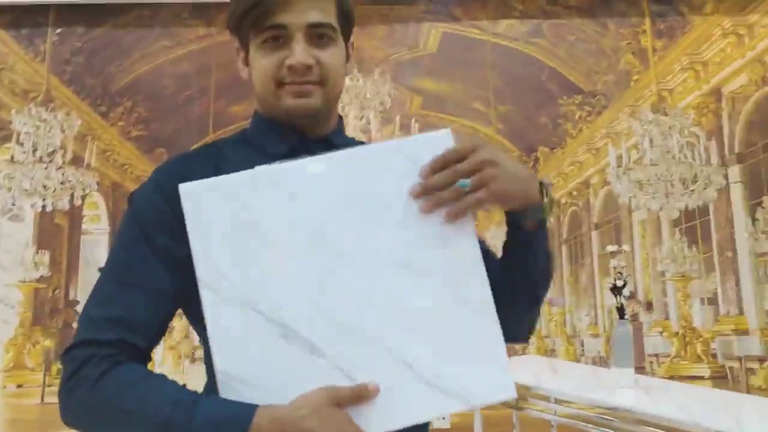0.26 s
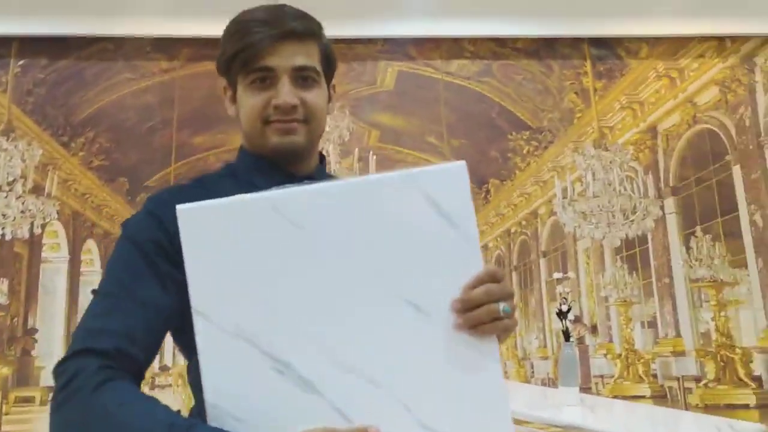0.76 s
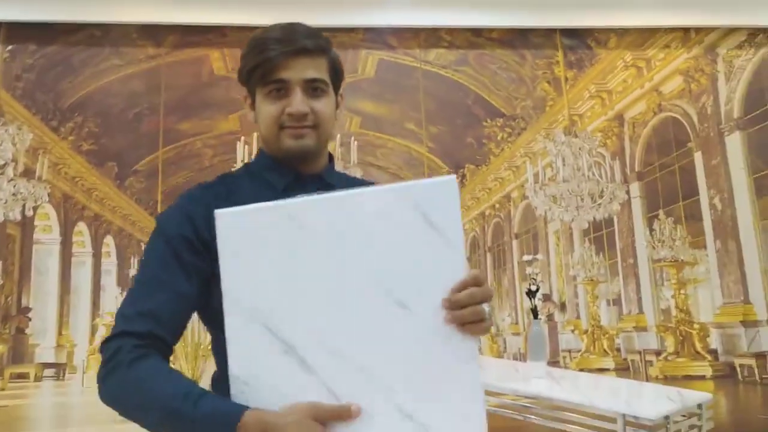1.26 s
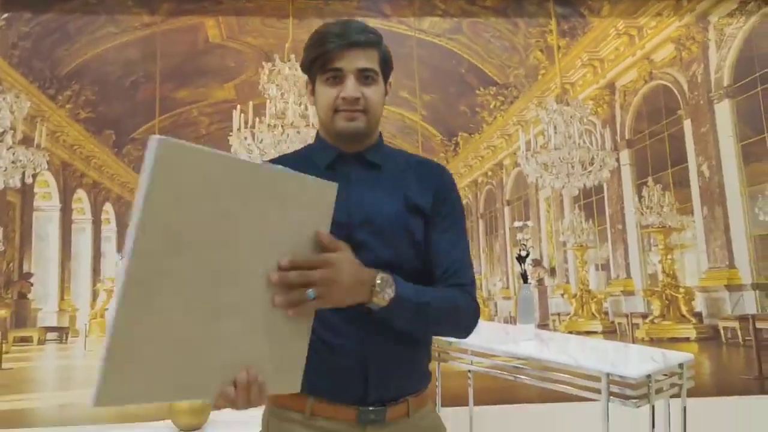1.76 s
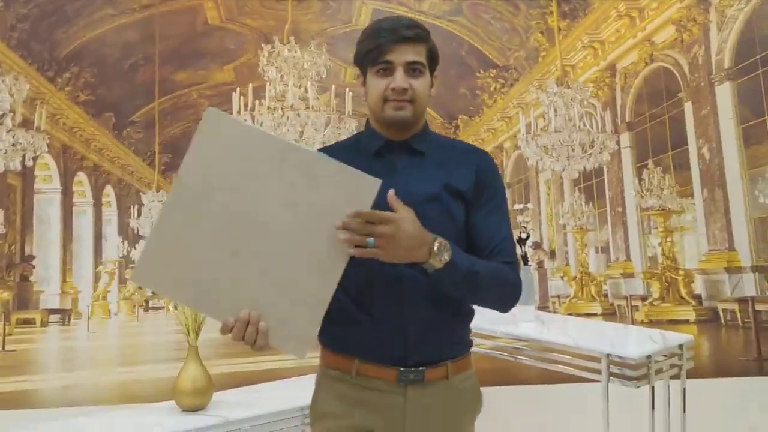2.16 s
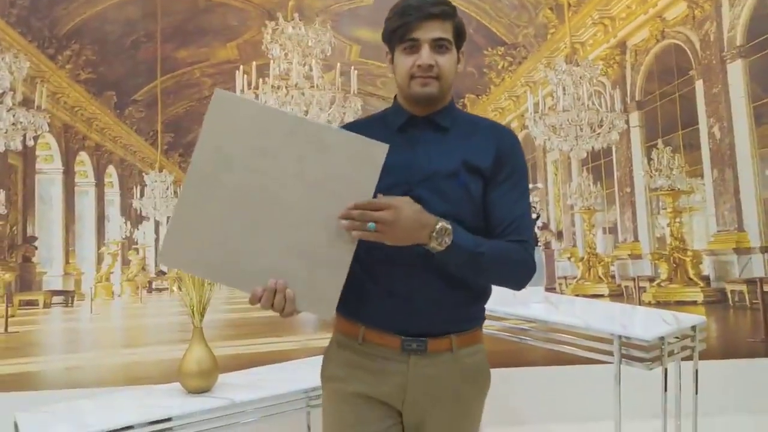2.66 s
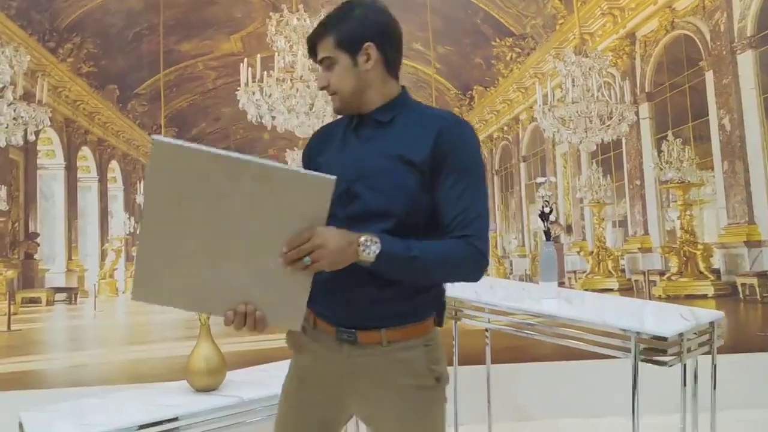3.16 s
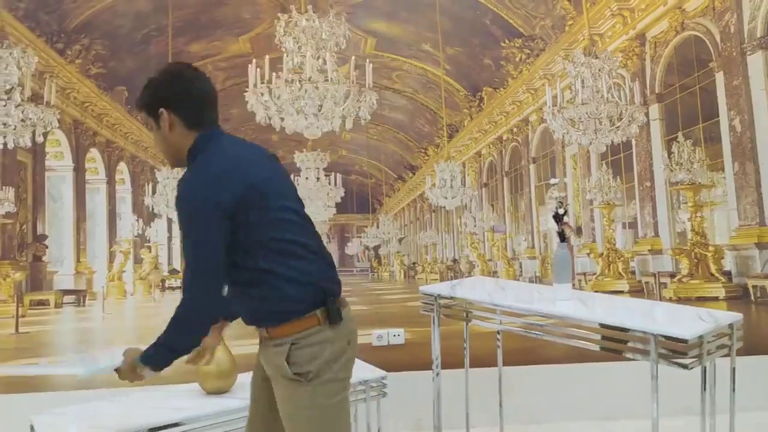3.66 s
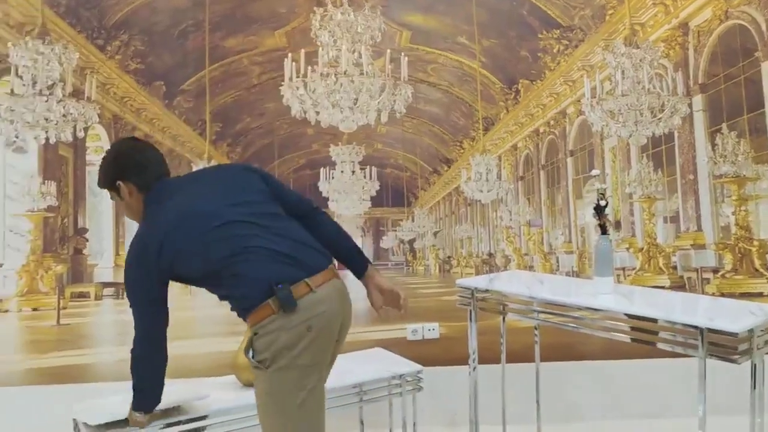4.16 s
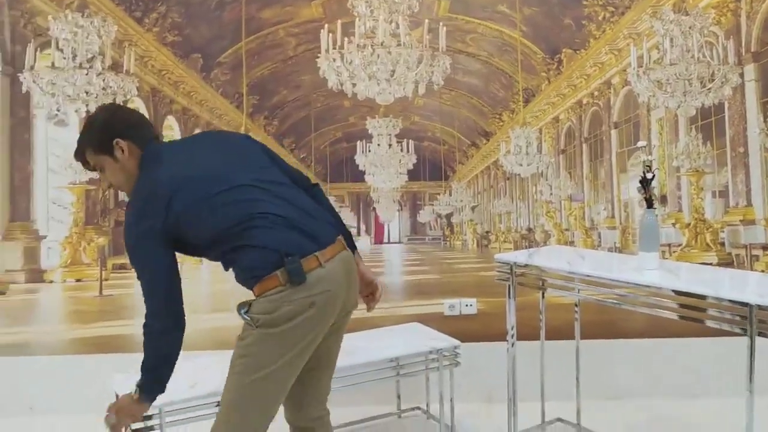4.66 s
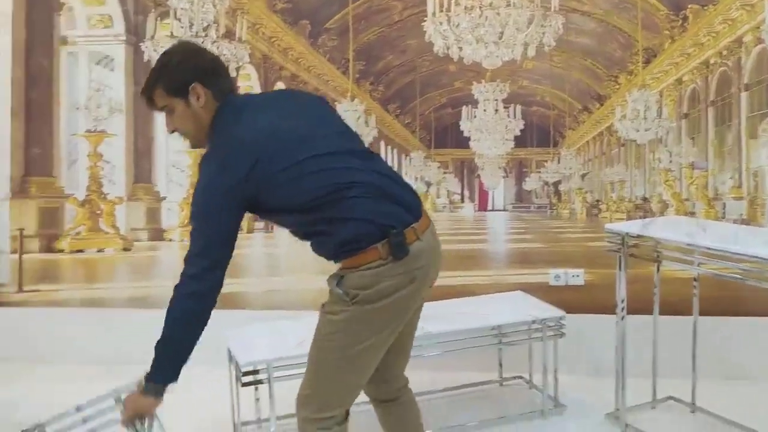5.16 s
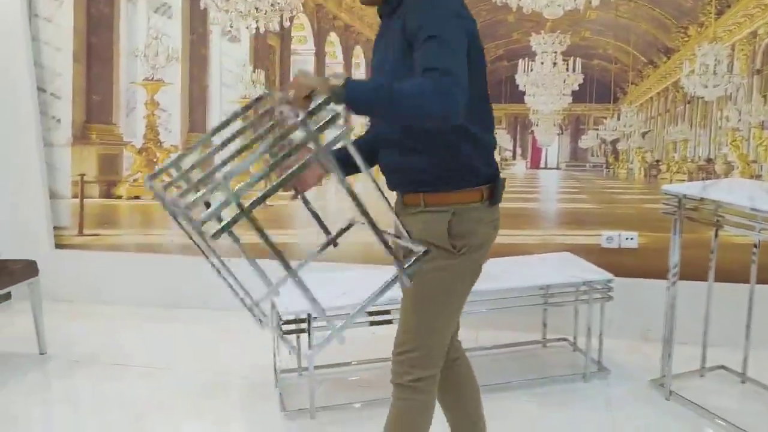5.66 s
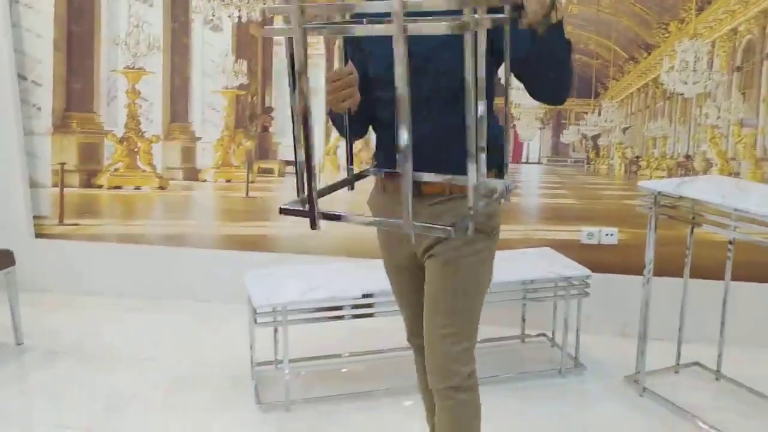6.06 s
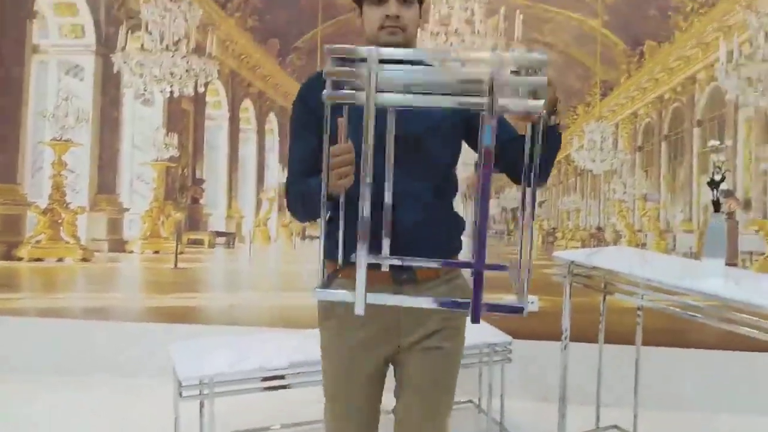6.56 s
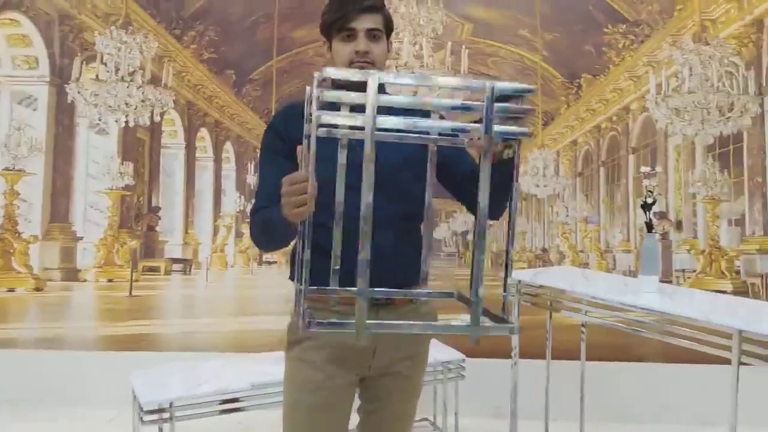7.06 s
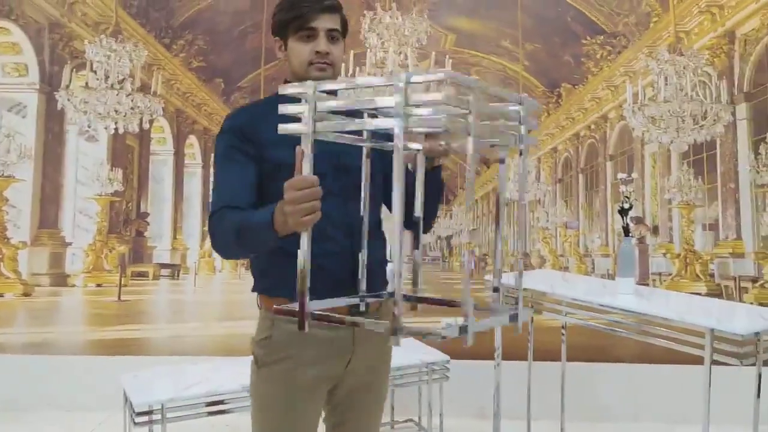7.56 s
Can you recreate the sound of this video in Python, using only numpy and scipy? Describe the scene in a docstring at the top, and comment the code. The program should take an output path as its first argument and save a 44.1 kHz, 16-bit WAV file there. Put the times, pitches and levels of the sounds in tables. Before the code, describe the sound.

Dull pats on a held stone slab, a heavy double clatter as it lands, then a metallic clank, short droning scrape and brighter clank.

```python
"""Marble slab and steel frame in a showroom

A hard-walled showroom, heard from a few metres through a two-port phone, over low ventilation and far street.
Sleeves rustle as fibre-grain noise. A man pats a marble slab in his hands and lays it on another: pushes ring
its modes, and noise bursts crack and clatter as it lands twice and rocks. He knocks a tubular steel frame,
drags its feet so jolts make it drone, and clanks it once more. A diffuse tail follows the near sounds."""
import sys
import numpy as np
from scipy import signal
from scipy.fft import rfft, irfft, next_fast_len
from scipy.io import wavfile
from scipy.ndimage import uniform_filter1d

SR = 44100
rng = np.random.default_rng(int(sys.argv[2]) if len(sys.argv) > 2 else 0)


def transcribe(u):
    """Save the signal u as a 16-bit wav file named by the first command-line argument.

    u: samples, shape (n,) or (channels, n), limited to [-1, 1]; the rate is SR.
    q: integer samples, one column per channel.
    """
    v = np.clip(np.atleast_2d(u).T, -1, 1)
    q = np.round(v * 32767).astype(np.int16)
    wavfile.write(sys.argv[1], SR, q)


N = 344096
T = np.arange(N) / SR

# Levels of sources are set ahead of the room and the stereo gains; colours are relative spectra.
# ventilation and far street: pitch_hz, level_db (per Hz)
AIR_COLOUR = [(18, -20.5), (40, 0), (91, -3), (120, -14.5), (161, 0), (211, -6), (249, -2), (344, -3.5),
              (428, -12), (464, -13.5), (678, -20), (913, -19), (3540, -28), (8660, -36.5), (10800, -37.5),
              (13000, -55.5)]
AIR_DB = -52
# brief bass swells: start_s, rise_s, hold_s, fade_s, pitch_hz, level_db
BASS_SWELLS = [(2.8, 0.34, 0.031, 0.7, 80.5, -52.5), (4.22, 0.023, 0.27, 0.43, 64, -46)]
# reverberation by band: pitch_hz, t60_s
ROOM_DECAY = [(125, 0.53), (350, 0.81), (1000, 0.99), (2800, 1), (6000, 0.77), (8200, 0.46), (11500, 0.25)]
ROOM_DB, ROOM_RISE_MS = -0.5, 2.3
# stereo width: pitch_hz, side_gain_db
SIDE_COLOUR = [(60, -6), (110, -21.5), (200, -15.5), (360, -11.5), (670, -5), (1210, 0.5), (2210, -1),
               (4040, 0.5), (7370, -0.5), (13400, 1)]
MIC_DIP_HZ, MIC_DIP_WIDTH_HZ, MIC_DIP_SHARE = 3608, 2220, 0.65
TOP_HZ = 13300
FADE_DB = 25  # every swell rises from, and fades to, this far under its top, then goes on falling

# sleeves and palms sliding: start_s, rise_s, hold_s, fade_s, treble_db, body_db (relative to treble)
RUSTLES = [(0, 0.0035, 0.46, 0.19, -65.5, 2.5), (0.597, 0.2, 0.2, 0.3, -77.5, 11),
           (1.15, 0.063, 0.068, 0.32, -77, 9.5), (1.33, 0.23, 0.018, 0.43, -57.5, 5.5),
           (1.454, 0.24, 0.033, 0.19, -50.5, -15.5), (1.694, 0.12, 0.029, 0.097, -48.5, -6),
           (1.972, 0.016, 0.015, 0.087, -73, 8), (1.994, 0.62, 0.024, 0.067, -62.5, -1.5),
           (3.297, 0.14, 0.5, 0.35, -61, -1.5), (5.474, 0.047, 0.036, 0.079, -62, 0.5),
           (5.563, 0.18, 0.11, 0.45, -59.5, -2.5), (6.949, 0.12, 0.042, 0.19, -64.5, 2.5)]
# bright fibre hiss: pitch_hz, level_db (per Hz)
FIBRE_COLOUR = [(1760, -23.5), (3000, 3.5), (4500, -5), (7350, -2), (9510, -1), (11800, -13),
                (12500, -18.5), (13000, -36)]

# tones of the dragged frame: pitch_hz, width_hz, level_db (relative), start_above_hz, wake_s
DRONE_TONES = [(200, 44, -6.5, 3, 0.11), (375, 90, 2.5, 3, 0.064), (294.4, 19, 13.5, 59, 0.004),
               (483.5, 26, 6, 3.7, 0.034), (750, 280, -7.5, 3, 0.016), (1033, 18, 1.5, 3.1, 0.16)]
DRAG_S, DRAG_RISE_S, DRAG_HOLD_S = 5.027, 0.008, 0.13
DRONE_DB, DRONE_FADE_S, DRONE_SETTLE_S = -37, 0.39, 0.1
# grit under the frame's feet: pitch_hz, level_db (per Hz)
SCRAPE_COLOUR = [(700, -19), (2000, 3.5), (3500, -13.5), (4600, -1), (6300, -2.5), (8500, -19.5),
                 (11000, -18.5), (13000, -34)]
SCRAPE_DB, SCRAPE_RISE_S, SCRAPE_HOLD_S, SCRAPE_FADE_S = -38, 0.14, 0.024, 0.08

# clear steel frame modes: pitch_hz, foot_db, rails_db (relative, by place struck)
FRAME_MODES = [(678, -40, -24), (829, -30, -5), (1057, -30, -11), (1085, -32, -16), (1384, -28, -15),
               (1680, -30, -19), (1855, -17, -18), (2040, -21, -18), (2148, -26, -9), (2208, -20, -19),
               (2354, -28, -10), (2432, -28, -3), (2940, -28, -15), (3133, -24, -14), (4025, -28, -19),
               (4490, -22, -19), (4733, -12, -16), (4813, -26, -12), (4975, -12, -11), (5082, -24, -7),
               (5160, -20, 2), (5231, -24, -9), (5674, -19, -10), (5981, -20, -10), (6110, -12, -6),
               (6261, -15, -4), (6383, -21, -8), (6525, -13, -7), (6582, -8, -11), (6704, -13, -7),
               (6988, -11, -5), (7117, -8, -12), (7263, -9, -5), (7449, -4, -8), (7654, -15, -8),
               (8045, -1, -11), (8298, -3, -15), (9282, -7, -26), (9405, -10, -19), (9545, -8, -19),
               (9888, -6, -8), (10390, -9, -14), (10950, -14, -13)]
# blows on the frame: start_s, place (0 foot, 1 top rails), rattle_ms, tube_db, t60_s (at 3 kHz), crowd_db,
# crowd_t60_s (mean), crack_db, pan_db (left minus right), bounce_ms, bounce_db (relative), build_ms (at 2 kHz)
BLOWS = [(4.937, 0, 5.8, -15.5, 0.38, -24, 0.16, -30, -3, 21, -8.5, 18),
         (6.2116, 1, 1.52, -12.5, 0.19, -23, 0.11, -11, 0, 8, -4, 11)]
# crowded weaker frame modes, one list per place struck: pitch_hz, level_db (relative)
CROWD_COLOURS = [
    [(410, -58), (700, -36.5), (1500, -16.5), (1800, -3.5), (2600, -4), (3000, -10.5), (3650, -15.5),
     (4600, -7.5), (5260, -19), (8170, -4), (8680, -9), (10300, -3), (13000, -38.5)],
    [(290, -48), (500, -7), (753, -28), (806, -10), (1060, -16), (1180, -2.5), (2370, 0), (2790, -10.5),
     (3240, 4.5), (3560, -37), (4500, -4), (5010, 0.5), (8200, -1), (8900, -18), (9800, -10), (13000, -13)],
]
# first contact of metal on metal: pitch_hz, level_db (per Hz)
TICK_COLOUR = [(900, -42), (2500, -18), (4300, -20.5), (6200, 3.5), (7800, -2.5), (8800, -15.5),
               (10000, -3.5), (12000, -10.5), (13500, -25)]

# slab modes: pitch_hz, t60_s (before shortening by hands or bed), landing_db (on an edge), pat_db (in the middle)
SLAB_MODES = [(213.6, 0.048, -11.5, -4), (250, 0.092, 2, -3), (304, 0.07, -8, -11),
              (319, 0.042, -14.5, -1.5), (426, 0.15, -7.5, -11), (486, 0.13, -8, -7.5),
              (553.5, 0.087, -7, -7.5), (617.7, 0.14, -2, -1.5), (698, 0.12, -6, -24),
              (818, 0.15, -4.5, -9), (907, 0.12, 1, -8.5), (1039, 0.12, -3, -19), (2120, 0.15, 2, -9),
              (2460, 0.08, -25.5, -10)]
# fingers on the slab held in the air: start_s, level_db, contact_ms, slap_db (relative)
FINGER_PATS = [(2.17, -58, 0.9, -21), (2.494, -27, 1.2, -6.5), (2.667, -30, 1.65, -2.5),
               (2.812, -28, 1.68, -7), (3.669, -36, 2.86, -5.5), (3.938, -39.5, 2.46, -16.5)]
# skin slap: pitch_hz, level_db (per Hz)
SKIN_COLOUR = [(410, -23), (700, 10), (1300, 8.5), (2450, 9), (3740, 7.5), (4330, 1), (9700, -6.5),
               (12500, -38), (16200, -78), (22000, -120)]
PALM_HZ, PALM_T60_S, PALM_DB = 189, 0.059, -4  # a thud of the palm, heard only in the hands
HANDS_RING_SHARE, BED_RING_SHARE = 0.77, 0.9  # of each mode's t60
# the slab's edges landing on the slab beneath: start_s, level_db, contact_ms, crack_db (relative), crack_hz
EDGE_LANDINGS = [(4.121, -17, 0.59, 0, 1300), (4.129, -13.5, 1.77, -25, 800),
                 (4.168, -12.5, 0.67, 0.5, 700), (4.181, -14, 1.5, -18.5, 640), (4.206, -19, 1.3, -3, 640),
                 (4.268, -13.5, 0.33, 6, 960), (4.28, -11.5, 1.96, -22, 700), (4.305, -16, 0.44, -3, 1050),
                 (4.33, -13.5, 1.86, -19.5, 640), (4.353, -20, 1.7, -10, 900),
                 (4.378, -22, 0.81, -11.5, 640), (4.404, -19.5, 2.3, -13.5, 900),
                 (4.447, -20.5, 2, -6, 1800), (4.465, -15, 1.7, -1.5, 700), (4.486, -27, 0.86, 1, 800),
                 (4.536, -27, 2.1, -1.5, 900)]
# crowded modes of both slabs together: pitch_hz, level_db (per Hz)
CLATTER_COLOUR = [(35, -54), (60, -3), (110, -1.5), (170, 2.5), (250, 4.5), (361, 1), (629, -13.5),
                  (735, -15), (897, -13), (2080, -15), (3790, -24), (9610, -43), (12000, -49.5),
                  (15600, -84), (22000, -120)]
CLATTER_T60_S, CLATTER_DB = 0.1, -8.5  # level relative to the landing
# rocking and sliding on the bed: start_s, chatter_db, chatter_fade_s, grit_db, grit_fade_s
ROCKS = [(4.122, -17.5, 0.059, -46.5, 0.26), (4.269, -37.5, 1.36, -60, 0.23),
         (4.44, -44, 0.22, -49.5, 0.41)]
ROCKING_RISE_S = 0.013
# the slab slides into place: start_s, rise_s, hold_s, fade_s (swell uses at least 0.01), level_db
SLAB_SLIDE = (4, 0.15, 0.07, -0.2, -48)
# stone sliding on stone: pitch_hz, level_db (per Hz)
STONE_COLOUR = [(1500, -21), (3500, 9.5), (5500, -3), (7000, -15), (10500, -13.5), (13000, -27)]


def undb(db):
    """dB to gain."""
    return 10 ** (np.asarray(db) / 20)


def unit(x):
    """Scale to rms 1."""
    return x / np.sqrt(np.mean(x ** 2))


def colour(x, table):
    """Filter by a (Hz, dB) spectrum, straight over log frequency."""
    hz, db = np.transpose(table)
    f = np.arange(len(x) // 2 + 1) * SR / len(x) + 1  # +1 avoids log of zero
    return irfft(rfft(x) * undb(np.interp(np.log(f), np.log(hz), db)), len(x))


def ring(x, hz, t60):
    """One decaying mode driven by x."""
    pole = np.exp(2j * np.pi * hz / SR - np.log(1000) / (t60 * SR))
    return signal.lfilter([1], [1, -pole], x).imag


def add(out, s, sound):
    """Mix a sound in at s seconds."""
    i = int(s * SR)
    out[i:i + len(sound)] += sound[:N - i]


def walk(rate):
    """Random levels held 1 / rate s and smoothed twice."""
    k = int(SR / rate)
    steps = np.repeat(rng.standard_normal(N // k + 1), k)
    return uniform_filter1d(uniform_filter1d(steps, k), k)[:N]


def grains(rate, scatter_db):
    """Random contacts of uneven size, rate per second on average."""
    hits = rng.random(N) < rate / SR
    size = rng.standard_normal(N) * undb(scatter_db * rng.exponential(size=N))
    return unit(hits * size)


def burst(table, rise_s, t60):
    """Coloured noise that rises fast and dies away."""
    t = T[:SR // 2]
    noise = unit(colour(rng.standard_normal(len(t)), table))
    return noise * (1 - np.exp(-t / rise_s)) * 1000 ** (-t / t60)


def swell(start_s, rise_s, hold_s, fade_s, db):
    """Gain that rises, holds and fades, straight in dB."""
    top = T - start_s - rise_s
    rising = top / rise_s
    fading = (hold_s - top) / max(fade_s, .01)
    return undb(db + FADE_DB * np.minimum(np.minimum(rising, fading), 0))


def air():
    """Ventilation and far street as wavering noise bands, unrelated in mid and side, plus shared bass swells."""
    pair, slow = np.zeros((2, N)), walk(0.87)
    noise = [colour(rng.standard_normal(N), AIR_COLOUR) for _ in range(2)]
    for hz in 20 * 2. ** np.arange(10):
        gain = undb(.4 * slow + .8 * walk(6))
        octave = [(hz / 2, -60), (hz / 1.42, -3), (hz, 0), (hz * 1.42, -3), (hz * 2, -60)]
        for k in range(2):
            pair[k] += gain * colour(noise[k], octave)
    boom = 0
    for *shape, hz, db in BASS_SWELLS:
        boom = boom + unit(ring(rng.standard_normal(N), hz, 0.2)) * swell(*shape, db)
    return undb(AIR_DB) * pair / np.std(pair[0]) + boom * np.array([[1], [.6]])


def rustle():
    """Sleeves and palms: fine fibre grains, bright hiss over a duller body."""
    hiss = unit(colour(grains(4000, 1.2), FIBRE_COLOUR)) * undb(6.4 * walk(30) + 1.6 * walk(11))
    dull = [(500, -39.5), (1100, -4.0), (1500, -1.5), (2000, 1.5), (2500, 4), (3200, -22.5)]
    body = unit(colour(grains(4500, 0.64), dull)) * undb(4.0 * walk(22))
    return sum(swell(*shape) * (hiss + undb(body_db) * body) for *shape, body_db in RUSTLES)


def drag():
    """Feet stick and slip: dense random jolts drive resonances whose pitches sag at the start; grit hisses."""
    jolts = grains(1200, 1.5) * undb(1.5 * walk(25))
    since, drone = np.clip(T - DRAG_S, 0, None), 0
    for hz, width, db, above_hz, wake_s in DRONE_TONES:
        pitch = hz + above_hz * np.exp(-since / DRONE_SETTLE_S)  # sags as the load comes off
        turn = np.exp(2j * np.pi * np.cumsum(pitch) / SR)
        awake = 1 - np.exp(-(since / wake_s) ** 2)  # each tone joins at its own pace
        # a low-pass on jolts turned down to 0 Hz, turned back up: a resonance that follows the pitch
        tone = turn * signal.lfilter([1], [1, -np.exp(-np.pi * width / SR)], jolts / turn)
        drone = drone + undb(db) * awake * width * tone.imag
    drone = signal.sosfilt(signal.butter(2, 150, "high", fs=SR, output="sos"), drone)
    grit = unit(colour(grains(4000, 1), SCRAPE_COLOUR)) * undb(4 * walk(30))
    return (unit(drone) * swell(DRAG_S, DRAG_RISE_S, DRAG_HOLD_S, DRONE_FADE_S, DRONE_DB)
            + grit * swell(DRAG_S, SCRAPE_RISE_S, SCRAPE_HOLD_S, SCRAPE_FADE_S, SCRAPE_DB))


def build_up(t, hz, build_ms):
    """Low bending waves spread slowly, so low modes build up later."""
    return 1 - np.exp(-t * 1000 / (build_ms * (2000 / hz) ** 1.93))


def clear_tubes(t, strike, place, t60, build_ms):
    """Clear frame modes rung by the strike; like tubes ring slightly apart and beat."""
    tubes = 0
    for hz, *mode_db in FRAME_MODES:
        length = t60 * (max(hz, 2200) / 3000) ** -.7  # higher modes radiate their energy sooner
        mode = ring(strike, hz, length)
        for r in rng.standard_normal(4):
            mode = mode + .5 * ring(strike, hz * (1 + .008 * r), .7 * length)
        tubes = tubes + undb(mode_db[place]) * build_up(t, hz, build_ms) * mode / np.abs(mode).max()
    return tubes


def crowded_tubes(t, place, crowd_t60, build_ms):
    """500 weaker modes of random pitch, phase, life and size; rms 1 over the first 50 ms."""
    hz, phase, life, luck = rng.random((500, 4)).T[:, :, None]
    hz = 600 + 12400 * hz
    table_hz, table_db = np.transpose(CROWD_COLOURS[place])
    size = undb(np.interp(np.log(hz), np.log(table_hz), table_db)) * undb(-12 * luck)
    crowd = size * build_up(t, hz, build_ms) * np.sin(2 * np.pi * (hz * t + phase))
    decay = np.exp(-np.log(1000) * t / (crowd_t60 * (.5 + life)))
    crowd = np.sum(crowd * decay, axis=0)
    return crowd / np.std(crowd[:SR // 20])


def frame():
    """A blow rattles and bounces, ringing clear tube modes over a crowd of weaker ones; mid and side."""
    out, side, t = np.zeros(N), np.zeros(N), T[:SR // 2]
    for (s, place, rattle_ms, tube_db, t60, crowd_db, crowd_t60, crack_db, pan_db,
         bounce_ms, bounce_db, build_ms) in BLOWS:
        strike = rng.standard_normal(len(t)) * np.exp(-t * 1000 / rattle_ms)
        late = np.clip(t * 1000 - bounce_ms, 0, None)
        bounce = rng.standard_normal(len(t)) * np.exp(-late / rattle_ms) * (late > 0)
        strike = strike + .5 * undb(bounce_db) * bounce
        tubes = clear_tubes(t, strike, place, t60, build_ms)
        crowd = crowded_tubes(t, place, crowd_t60, build_ms)
        sound = (1 - np.exp(-t / 0.0033)) * (undb(tube_db) * tubes + undb(crowd_db) * crowd)
        sound = sound + undb(crack_db) * burst(TICK_COLOUR, 0.0039, 0.034)
        bounce_tick = burst(TICK_COLOUR, .0015, 0.0303)[:SR // 4]
        add(sound, bounce_ms / 1000, undb(crack_db + bounce_db) * bounce_tick)
        add(out, s, sound)
        add(side, s, sound * (undb(pan_db) - 1) / (undb(pan_db) + 1))
    return out, side


def knock(contact_ms, share, held):
    """The slab's modes after one half-sine push; a shorter push is brighter. Peak 1."""
    t = T[:SR // 2]
    push = np.sin(np.pi * np.clip(t * 1000 / contact_ms, 0, 1))
    body = 0
    for k, (hz, t60, *mode_db) in enumerate(SLAB_MODES):
        # neighbouring modes swing against each other
        body = body + (-1) ** k * undb(mode_db[held]) * ring(push, hz, t60 * share)
    body = body * (1 - np.exp(-t / 0.0039))  # the bending wave needs some ms to cross the slab
    return body / np.abs(body).max()


def slab_pats():
    """Fingers pat the held slab: its modes, a thud of the palm and the slap of skin."""
    out, t = np.zeros(N), T[:SR // 2]
    for s, db, contact_ms, slap_db in FINGER_PATS:
        thud = np.sin(2 * np.pi * PALM_HZ * t) * 1000 ** (-t / PALM_T60_S)
        slap = burst(SKIN_COLOUR, 0.0018, 0.062)
        body = knock(contact_ms, HANDS_RING_SHARE, held=True)
        add(out, s, undb(db) * (body + undb(PALM_DB) * thud + undb(slap_db) * slap))
    return out


def slab_landing():
    """Each edge contact rings the slab, cracks, and sets both slabs clattering."""
    out = np.zeros(N)
    for s, db, contact_ms, crack_db, crack_hz in EDGE_LANDINGS:
        crack_colour = [(300, -10.5), (crack_hz / 1.3, -3), (crack_hz, 8), (crack_hz * 1.6, 1.5), (2200, -1.5),
                        (3300, -8), (5000, -30), (9000, -34), (12500, -63.0)]
        crack = burst(crack_colour, 0.0012, 0.042)
        clatter = burst(CLATTER_COLOUR, 0.0062, CLATTER_T60_S)
        body = knock(contact_ms, BED_RING_SHARE, held=False)
        add(out, s, undb(db) * (body + undb(crack_db) * crack + undb(CLATTER_DB) * clatter))
    return out


def slab_rocking():
    """Stone slides and rocks on stone: hissing grit and sparser chattering contacts."""
    chatter = unit(colour(grains(450, 0.41), CLATTER_COLOUR))
    grit = unit(colour(grains(1500, 2.1), FIBRE_COLOUR)) * undb(4.1 * walk(28))
    slide = unit(colour(grains(2500, 1.5), STONE_COLOUR)) * undb(4.2 * walk(35))
    out = slide * swell(*SLAB_SLIDE)
    for s, chatter_db, chatter_s, grit_db, grit_s in ROCKS:
        out += chatter * swell(s, ROCKING_RISE_S, 0, chatter_s, chatter_db)
        out += grit * swell(s, ROCKING_RISE_S, 0, grit_s, grit_db)
    return out


def room(x):
    """Direct sound and a diffuse tail that dies band by band, for mid and for side."""
    t, out = T[:int(1.5 * SR)], []
    for k in range(2):
        tail = 0
        for hz, t60 in ROOM_DECAY:
            shape = [(hz / 3, -40), (hz / 1.7, -3), (hz, 0), (hz * 1.7, -3), (hz * 3, -40)]
            tail = tail + colour(rng.standard_normal(len(t)), shape) * 1000 ** (-t / t60)
        tail = tail * (1 - np.exp(-t * 1000 / ROOM_RISE_MS))
        # the ports hear the direct sound at slightly different times: side is set a quarter cycle off mid
        direct = x if k == 0 else signal.hilbert(x, next_fast_len(N)).imag[:N]
        out.append(direct + undb(ROOM_DB) * signal.fftconvolve(x, tail / np.linalg.norm(tail))[:N])
    return np.array(out)


def scene():
    """All near sources in the room, over the air; mid and side to left and right."""
    steel, steel_side = frame()
    near = rustle() + drag() + steel + slab_pats() + slab_landing() + slab_rocking()
    # small objects radiate deep bass poorly
    near = signal.sosfilt(signal.butter(3, 130, "high", fs=SR, output="sos"), near)
    mid, side = undb(-3.0) * room(near) + air()
    side = colour(side, SIDE_COLOUR) + undb(-6.0) * steel_side
    return np.array([undb(-1.53) * (mid + side), undb(-1.02) * (mid - side)])


def record(dry):
    """The microphone port has a dip in the low treble; the top is cut."""
    b, a = signal.iirpeak(MIC_DIP_HZ, MIC_DIP_HZ / MIC_DIP_WIDTH_HZ, fs=SR)
    dipped = dry - MIC_DIP_SHARE * signal.lfilter(b, a, dry)
    return signal.sosfilt(signal.ellip(8, .2, 80, TOP_HZ, fs=SR, output="sos"), dipped)


dry = scene()
out = record(dry)
transcribe(out)
```